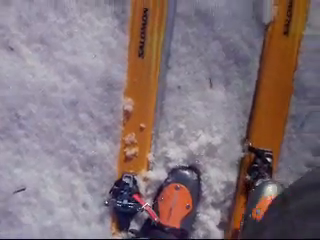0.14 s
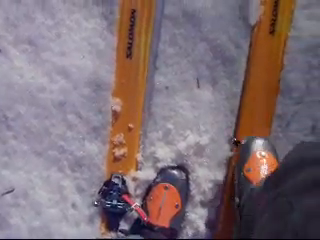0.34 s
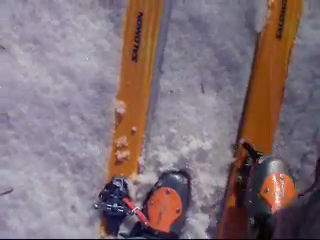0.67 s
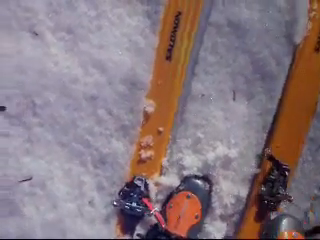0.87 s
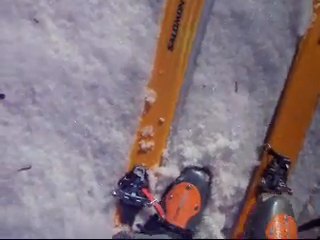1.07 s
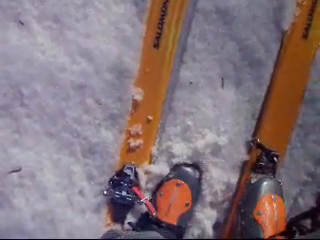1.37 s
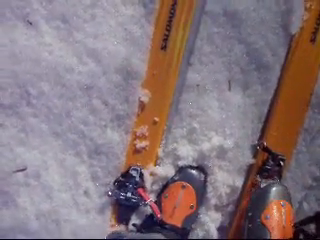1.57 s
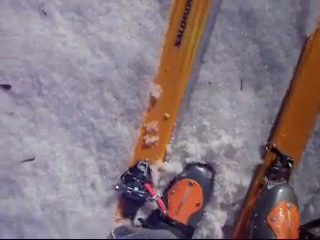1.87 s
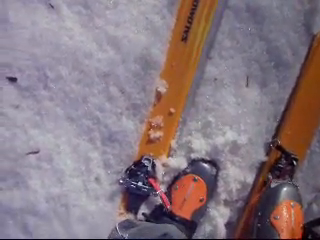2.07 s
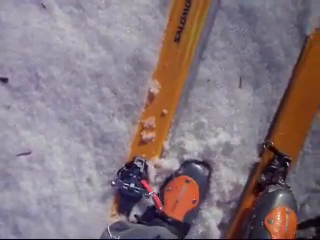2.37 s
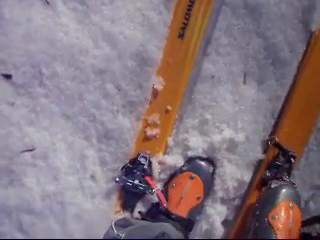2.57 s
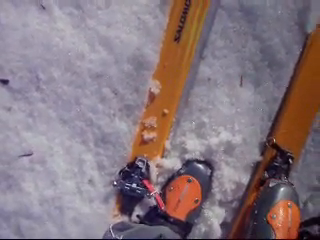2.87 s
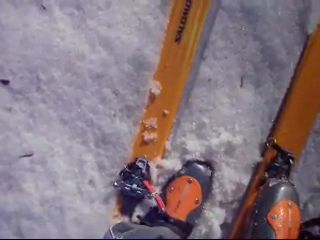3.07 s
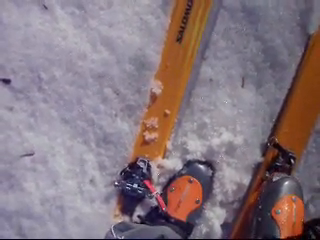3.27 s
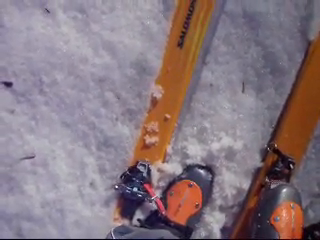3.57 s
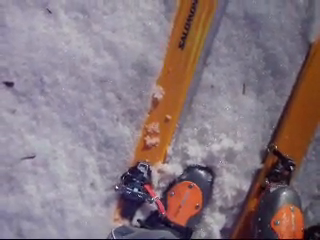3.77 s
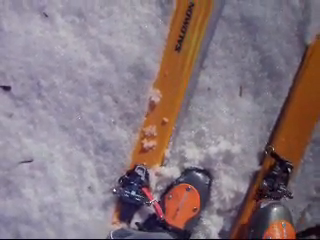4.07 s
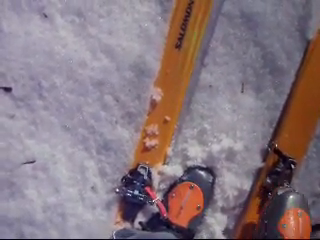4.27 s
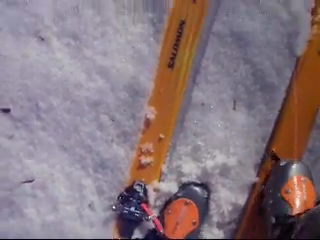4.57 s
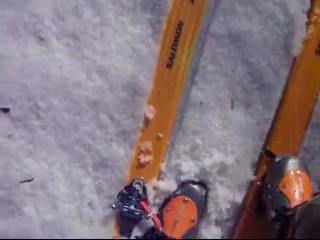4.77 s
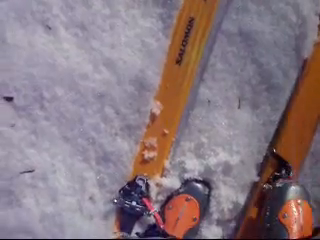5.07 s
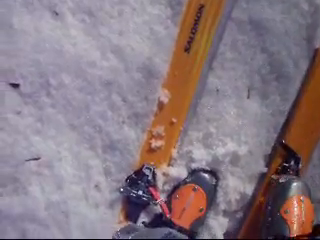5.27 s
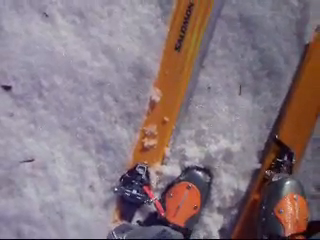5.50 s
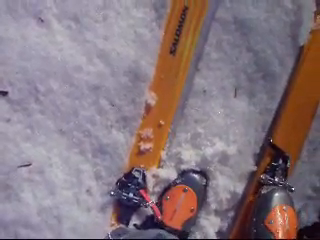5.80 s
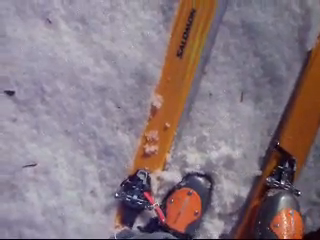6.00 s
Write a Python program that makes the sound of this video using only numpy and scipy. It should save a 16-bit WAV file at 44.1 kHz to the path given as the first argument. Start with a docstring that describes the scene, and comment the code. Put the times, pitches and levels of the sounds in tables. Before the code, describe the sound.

Sharp metallic clicks and gritty scrapes of a ski boot working into a metal binding on snow, in two bursts over steady faint hiss.

```python
"""On packed snow outdoors, a ski boot is worked into a metal touring binding.
Impacts excite the damped modes of the steel jaws; stick-slip drives the sole's scrapes over metal and snow.
Shifts of weight thud as damped flexing of the ski, snow ticks as single impulses, and air is shaped noise.
A small camera just above adds a steady hiss, hollow notches in the treble and a cut at the top."""
import sys
import numpy as np
from scipy import signal
from scipy.fft import rfft, irfft, next_fast_len
from scipy.io import wavfile

SR = 44100
rng = np.random.default_rng(int(sys.argv[2]) if len(sys.argv) > 2 else 0)


def wav_out(sig):
    """Save sig, one row per channel (or a flat mono array), as 16-bit PCM at SR to the path in sys.argv[1]."""
    wavfile.write(sys.argv[1], SR, np.round(np.clip(np.atleast_2d(sig).T, -1, 1) * 32767).astype(np.int16))


N = 270754
HIT_SIZE = 4096   # length of one impact [samples]

# strokes of the boot: (start [s], swell up to the push [s], easing off [s], level at the push [dB],
# share of bare metal against snow [0-1], resonance of the rubbed part [Hz])
STROKES = [(0.113, 0.016, 0.0082, -26, 0.66, 630), (0.167, 0.019, 0.049, -31, 0.6, 1400),
           (.264, 0.012, 0.026, -35.5, 0.9, 2940), (.549, 0.031, 0.031, -18, 0.57, 1350),
           (0.839, 0.027, 0.03, -24.5, 1, 1750), (0.913, 0.059, 0.057, -28.5, 0.66, 860),
           (1.095, 0.022, 0.035, -31, 0.8, 2880), (1.652, 0.12, 0.25, -35.5, 0.3, 500),
           (2.391, .028, 0.011, -36.5, 0.4, 3300), (2.495, 0.0038, 0.02, -27, 0.2, 3030),
           (4.701, 0.013, .033, -14, 0.87, 2580), (4.746, 0.0085, 0.11, -36.5, 0.7, 1170),
           (4.86, 0.063, 0.15, -43.5, 0.4, 3180), (5.121, 0.049, .012, -26.5, 0.67, 1400),
           (5.49, .02, 0.077, -45, 0.15, 3000), (5.87, 0.19, .022, -41.5, 0.15, 3150)]
# spectrum of rubbed or breaking snow: (frequency [Hz], relative level [dB per Hz])
SNOW_SPECTRUM = [(60, -39.5), (200, -3), (550, -2), (850, 0), (1300, -3), (2000, 0), (3200, -1.5),
                 (5000, -5), (7000, -16), (11000, -14), (12800, -30)]


def from_db(db):
    """Amplitude gain is ten to the power of a twentieth of the decibels."""
    return 10 ** (np.asarray(db) / 20)


def rms_one(x):
    """Normalise mean power: scale to an rms of 1."""
    return x / np.sqrt(np.mean(x ** 2) + 1e-20)


def burst_one(x, seconds):
    """Normalise energy: scale to that of a burst of rms 1 and this length."""
    return x * np.sqrt(seconds * SR / (np.sum(x ** 2) + 1e-20))


def add(out, s, x):
    """Superposition: mix x into out from time s [s] on."""
    at = max(0, round(s * SR))
    out[at:at + len(x)] += x[:max(0, N - at)]


def causal_filter(x, response):
    """Minimum-phase filter by folding the cepstrum; its level in dB is response(Hz)."""
    size = 2 * next_fast_len(len(x) // 2 + HIT_SIZE // 2)
    hz = np.maximum(np.fft.rfftfreq(size, 1 / SR), 1)
    cepstrum = irfft(np.log(from_db(response(hz))))
    # fold the anticausal half onto the causal half
    cepstrum[1:size // 2] *= 2
    cepstrum[size // 2 + 1:] = 0
    return irfft(rfft(x, size) * np.exp(rfft(cepstrum)))[:len(x)]


def coloured(x, spectrum):
    """Spectral shaping: a filter joined in dB along a log-frequency axis."""
    hz, db = np.transpose(spectrum)
    return causal_filter(x, lambda f: np.interp(np.log(f), np.log(hz), db))


def notched(x, notches):
    """Band rejection: bell-shaped dips in the level."""
    def dips(f):
        return sum(db * np.exp(-((f - hz) / width) ** 2) for hz, width, db in notches)
    return causal_filter(x, dips)


def resonance(x, hz, q):
    """Damped oscillator: a two-pole band-pass of quality q."""
    r = np.exp(-np.pi * hz / (q * SR))
    return signal.lfilter([1, 0, -1], [1, -2 * r * np.cos(2 * np.pi * hz / SR), r * r], x)


def drift(rate):
    """Low-passed noise: a smooth random course of rms 1 that changes about rate times a second."""
    step, settle = 20, 4000   # samples per slow value, slow values dropped while the filter settles
    r = np.exp(-2 * np.pi * rate * step / SR)
    noise = rng.standard_normal(N // step + settle + 2)
    slow = signal.lfilter([1], [1, -2 * r, r * r], noise)[settle:]
    return np.interp(np.arange(N) / step, np.arange(len(slow)), rms_one(slow))


def decaying_noise(t, t60):
    """Exponential decay: unit-energy noise that falls 60 dB in t60 [s]."""
    return burst_one(rng.standard_normal(len(t)) * from_db(-60 * t / t60), 1 / SR)


def contact(t, chatter_db, chatter_t60):
    """Impulsive force: one sharp blow followed by a spray of tiny rebounds."""
    return (t == 0) + from_db(chatter_db) * decaying_noise(t, chatter_t60)


def binding_clicks(ring_db=-13.5, mode_spread_db=8.5, detune=0.0093, shell_db=-2.0, shell_t60=0.038):
    """Modal excitation: each contact cracks and rings the modes; the plastic shell knocks duller."""
    # boot striking the binding: (time [s], level of the bright crack [dB], body of the knock re crack [dB])
    strikes = [(0.129, -27.5, 1), (0.2153, -32, -11), (0.55, -27, -9), (0.5825, -16, 2.5), (0.595, -25, -7),
               (0.6047, -14.5, -1), (0.8535, -18.5, -7), (0.8815, -26.5, -8), (0.919, -33, 4.5),
               (0.9318, -23.5, -12), (0.9641, -15, -6), (0.983, -16, -4), (1.0833, -13.5, -6.5),
               (1.1743, -23, -10), (1.1856, -14, -9), (1.2028, -35, -20), (1.2458, -27, -7),
               (1.2668, -27, -9), (1.2918, -19.5, -9.5), (1.3548, -24.5, -4.5), (1.3951, -36.5, 0),
               (1.782, -28.5, -4), (1.7932, -31, 0.5), (2.218, -40, 2.5), (2.2921, -43.5, 3),
               (2.4167, -31, -1.5), (2.4228, -32.5, -4), (2.499, -20, -10), (2.5027, -19.5, -9),
               (2.9115, -30, -10.5), (4.6833, -34.5, -1), (4.7068, -19.5, -0.5), (4.7572, -36, -17),
               (4.7798, -24.5, -11), (4.7975, -25, -4), (4.8105, -24, -13), (4.8691, -27.5, -12),
               (4.9138, -11, -.5), (4.927, -20.5, -5), (5.1039, -27.5, -16), (5.1366, -29, -14),
               (5.224, -36, -3.5), (5.782, -35.5, -8), (5.9701, -32.5, -9), (6.0241, -33, -6)]
    # ringing of the binding with the boot on it: (frequency [Hz], mean level [dB], t60 [s])
    mode_table = [(1125, 1, 0.03), (1400, -12, 0.045), (1520, -7.5, 0.033), (1750, 5, 0.01),
                  (2320, -2, 0.019), (2770, -12, 0.036), (3240, 2.5, 0.035), (4774, 4.5, 0.036),
                  (5080, -11, 0.021), (6350, -9, .016), (9030, 2, 0.026), (11100, -24, .018),
                  (11080, 1.5, 0.028)]
    # spectrum of the bright crack: (frequency [Hz], relative level [dB per Hz])
    crack_spectrum = [(1200, -21), (2100, 0.5), (3250, 4), (4700, -0.5), (5300, -3.5), (6000, -9),
                      (7200, -11.5), (9500, -14.5), (11200, -7), (12700, -16.5)]
    # spectrum of the duller knock: (frequency [Hz], relative level [dB per Hz])
    knock_spectrum = [(60, -34), (200, -9), (700, -6.5), (1100, -2.5), (1600, 2), (2100, -4.5),
                      (3200, -21.5), (8000, -46.5)]
    span = 0.005   # length that the burst levels refer to [s]
    tail_db, tail_t60 = -19, 0.13   # faint noise after the blow [dB, s]
    out, t = np.zeros(N), np.arange(HIT_SIZE) / SR
    hz, mode_db, t60 = np.transpose(mode_table)[:, :, None]
    for s, crack_db, body_db in [*strikes, *rattles()]:
        force = contact(t, chatter_db=-2.0, chatter_t60=0.022)
        # mode strengths vary widely and pitches slightly, at random, from blow to blow
        strength, shift = rng.standard_normal((2, len(mode_table), 1))
        decay = from_db(mode_db + mode_spread_db * strength - 60 * t / t60)
        modes = decay * np.cos(2 * np.pi * hz * (1 + detune * shift) * t)
        ringing = signal.fftconvolve(force, burst_one(modes.sum(axis=0), 1 / SR))[:len(t)]
        tail = decaying_noise(t, tail_t60)
        shell = decaying_noise(t, shell_t60)
        blow = force + from_db(ring_db) * ringing + from_db(tail_db) * tail
        crack = burst_one(coloured(blow, crack_spectrum), span)
        knock = burst_one(coloured(blow + from_db(shell_db) * shell, knock_spectrum), span)
        polarity = rng.choice([-1, 1])
        add(out, s, polarity * from_db(crack_db) * (crack + from_db(body_db) * knock))
    return out


def rattles(count=3):
    """Loose-joint impacts: each stroke shakes the jaws into (time [s], crack [dB], body re crack [dB])."""
    mean_db, spread_db, body_db = -14, 5.5, -2   # mean re the push, its scatter, body re the crack
    fade_db = 0.5   # change of level over the whole rattling span
    after_s = 0.012   # rattling outlasts the stroke by this much
    rows = []
    for start, swell, ease, push_db, _, _ in STROKES:
        along = (np.arange(count) + rng.random(count)) / count
        levels = push_db + mean_db + fade_db * along + spread_db * rng.standard_normal(count)
        times = start + swell + along * (ease + after_s)
        rows += [(s, db, body_db) for s, db in zip(times, levels)]
    return rows


def slips(per_s, size_db, clump_db, clump_rate):
    """Stick-slip friction: tiny random impulses of uneven size whose strength drifts in clumps."""
    sizes = from_db(size_db * np.minimum(rng.exponential(1, N), 4)) * rng.choice([-1, 1], N)
    return (rng.random(N) < per_s / SR) * sizes * from_db(clump_db * drift(clump_rate))


def boot_scrapes(sharpness=7.1, overtone=1.755, overtone_db=-12.5):
    """Friction-driven resonance: the sole grates over steel and crushes snow, which goes on crumbling."""
    # spectrum of the sole on steel: (frequency [Hz], relative level [dB per Hz])
    metal_spectrum = [(80, -53), (300, -23), (800, -9), (1300, 0.5), (2100, -5), (3100, 3.5), (4800, -1.5),
                      (5400, -3), (6300, -9.5), (9000, -14), (11200, -6), (12700, -13)]
    bite_db, leave_db = -10, -10.5   # start and end of a stroke, re its push
    on_snow_db, on_metal_db = -17, -7   # the rubbed part rings freely when bare, damped by snow
    settle_db, settle_t60 = -19.5, 0.67   # crumbling after each stroke [dB re push, s]
    edge_s = 0.0035   # time for the contact to close; it opens over twice this
    metal = coloured(slips(per_s=5000, size_db=3.3, clump_db=3.0, clump_rate=150), metal_spectrum)
    snow = coloured(slips(per_s=3000, size_db=4.0, clump_db=2.0, clump_rate=49), SNOW_SPECTRUM)
    out, crumbling, t = np.zeros(N), np.zeros(N), np.arange(N) / SR
    judder_db = 1.1 * drift(32)   # the sole catches and slides unevenly
    for start, swell, ease, push_db, share, part_hz in STROKES:
        end = start + max(swell + ease, edge_s)
        corners = [start - edge_s / 2, start + edge_s / 2, end, end + 2 * edge_s]
        on = (t > corners[0]) & (t < corners[-1])
        pressure = np.interp(t[on], corners, [0, 1, 1, 0])
        grit = np.sqrt(share) * rms_one(metal[on]) + np.sqrt(1 - share) * rms_one(snow[on])
        # the rubbed part answers with its lowest two bending modes
        lower_mode = rms_one(resonance(grit, part_hz, sharpness))
        upper_mode = rms_one(resonance(grit, overtone * part_hz, overtone * sharpness))
        part = lower_mode + from_db(overtone_db) * upper_mode
        part_db = share * on_metal_db + (1 - share) * on_snow_db
        rasp = rms_one(grit + from_db(part_db) * part)
        effort_db = np.interp(t[on], [start, start + swell, end], [bite_db, 0, leave_db])
        out[on] += rasp * pressure * from_db(push_db + effort_db + judder_db[on])
        add(crumbling, end, from_db(push_db + settle_db - 60 * t[:SR] / settle_t60))
    return out + crumbling * rms_one(snow)


def ski_thuds(swell_cycles=0.44, crush_db=-4.5, crush_t60=0.072):
    """Heavily damped flexure: snow stops the ski within a few cycles and gives way twice, crunching."""
    # weight coming down on the ski: (time [s], level [dB], pitch [Hz])
    weight_shifts = [(0.1278, -26.5, 583), (0.425, -43.5, 155), (0.583, -33, 178), (1.008, -31, 297),
                     (1.4713, -30, 149), (1.497, -38, 139), (1.612, -39.5, 145), (1.845, -34, 433),
                     (2.460, -39.5, 160), (3.143, -44, 145), (3.192, -41.5, 156), (3.651, -41, 190),
                     (4.15, -41.5, 106), (5.173, -28, 270)]
    sink_s, sink_db = 0.024, -17   # the ski sinks in once more, later and more softly
    span = 0.008   # length that the burst levels refer to [s]
    out, t = np.zeros(N), np.arange(HIT_SIZE) / SR
    second_sinks = [(s + sink_s, db + sink_db, hz) for s, db, hz in weight_shifts]
    for s, level_db, hz in [*weight_shifts, *second_sinks]:
        age = t * hz / swell_cycles
        displacement = age ** 2 * np.exp(-1.5 * age) * np.sin(2 * np.pi * hz * t)
        # the ski radiates with its speed, so no deep rumble is left
        flex = burst_one(np.gradient(displacement), span)
        crumble = rng.standard_normal(len(t)) * from_db(-60 * t / crush_t60)
        crush = burst_one(resonance(crumble, hz, 1.16), span)
        add(out, s, from_db(level_db) * burst_one(flex + from_db(crush_db) * crush, span))
    return out


def snow_ticks(level_db=-60):
    """Brittle fracture: single crystals give way under the standing skis as sparse impulses."""
    ticks = slips(per_s=28, size_db=0.0, clump_db=0.0, clump_rate=0.5)
    return from_db(level_db) * rms_one(coloured(ticks, SNOW_SPECTRUM))


def open_air(waver_db=0.1, buffet_db=-60, buffet_swing_db=2.5):
    """Broadband turbulence: a nearly steady outdoor hush with faint low buffets of breeze."""
    # spectrum of the hush: (frequency [Hz], relative level [dB per Hz])
    air_spectrum = [(25, -24), (70, -18), (115, -11), (200, -1), (400, 2), (700, -0.5), (1400, -3.5),
                    (2400, -9), (3300, -8), (4700, -11), (5600, -16.5), (7000, -18.5), (10000, -42),
                    (11300, -26), (13000, -26)]
    hush_db = -46.5 + waver_db * drift(5.5)
    hush = rms_one(coloured(rng.standard_normal(N), air_spectrum)) * from_db(hush_db)
    low_band = signal.butter(2, [95, 220], "band", fs=SR, output="sos")
    lows = signal.sosfilt(low_band, rng.standard_normal(N))
    buffets = rms_one(lows * from_db(buffet_swing_db * drift(3.1)))
    return hush + from_db(buffet_db) * buffets


def scene():
    """Free-field superposition: everything sounds close below the microphone, with no walls to answer."""
    return (binding_clicks() + boot_scrapes() + ski_thuds() + snow_ticks() + open_air())[None]


def record(dry):
    """Band limiting and saturation: the treble has hollow dips, the preamplifier hisses and rounds peaks."""
    # hollow dips in the incoming sound: (centre [Hz], width [Hz], depth [dB])
    treble_dips = [(3988, 372, -30), (7960, 490, -10.5), (11870, 260, -16)]
    # narrower dips that also cut the camera's own hiss: (centre [Hz], width [Hz], depth [dB])
    late_dips = [(8040, 320, -11), (12050, 260, -15)]
    # spectrum of the preamplifier hiss: (frequency [Hz], relative level [dB per Hz])
    hiss_spectrum = [(500, 5), (4000, 0), (7000, -7.5), (12000, -4.5)]
    hiss_db, cutoff_hz = -50.5, 12720
    top = 1.0   # amplitude that the rounded peaks approach
    hiss = from_db(hiss_db) * rms_one(coloured(rng.standard_normal(N), hiss_spectrum))
    heard = notched(dry[0], treble_dips) + hiss
    rounded = top * np.tanh(heard / top)
    heard = notched(rounded, late_dips)
    low_pass = signal.ellip(12, 0.2, 70, cutoff_hz, fs=SR, output="sos")
    return signal.sosfilt(low_pass, heard)[None]


dry = scene()
out = record(dry)
wav_out(out)
```